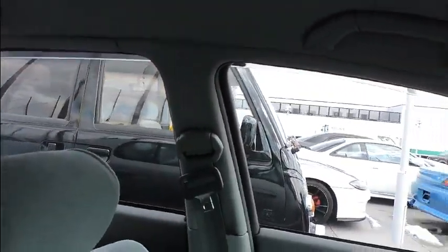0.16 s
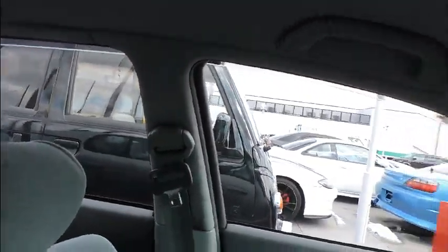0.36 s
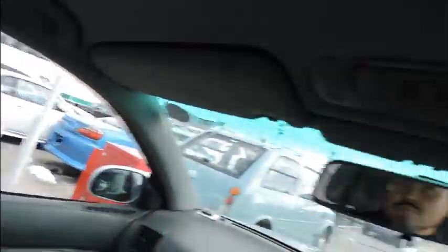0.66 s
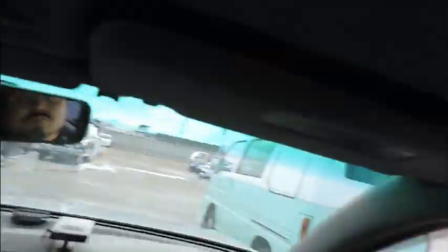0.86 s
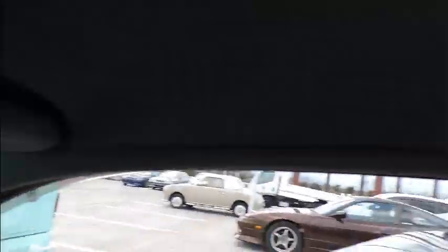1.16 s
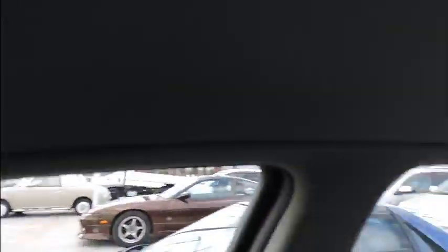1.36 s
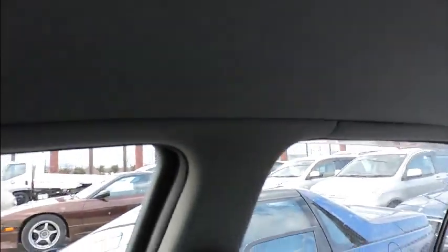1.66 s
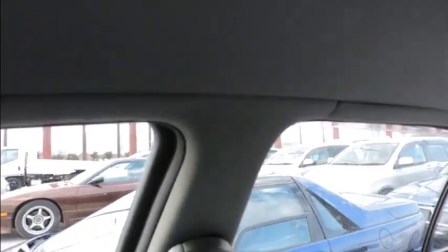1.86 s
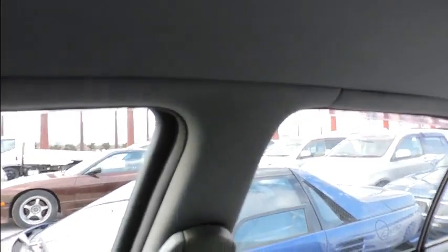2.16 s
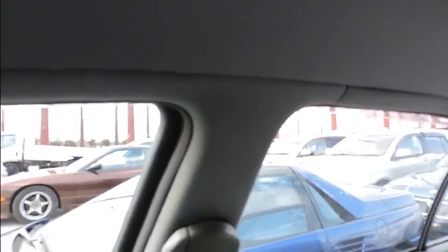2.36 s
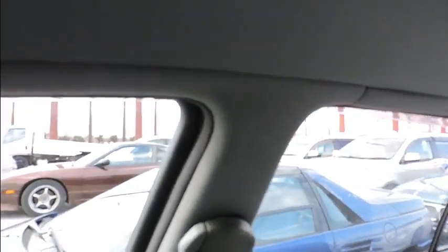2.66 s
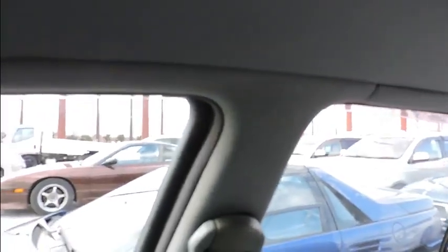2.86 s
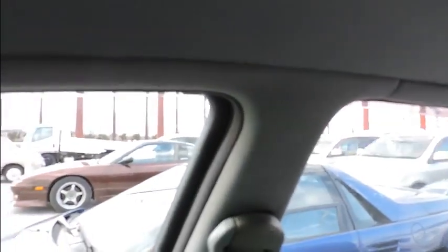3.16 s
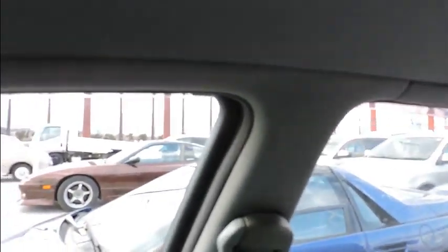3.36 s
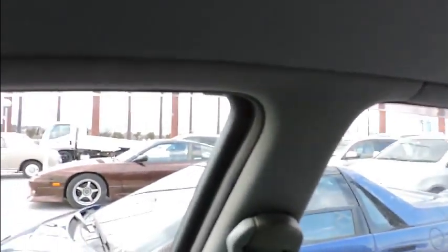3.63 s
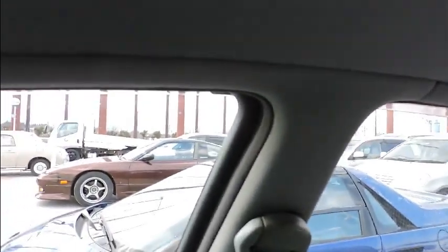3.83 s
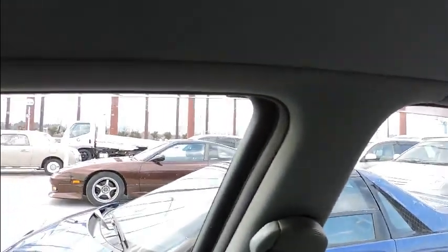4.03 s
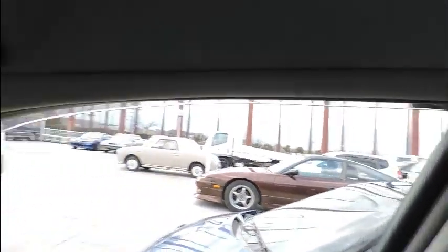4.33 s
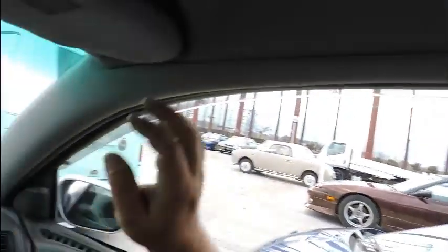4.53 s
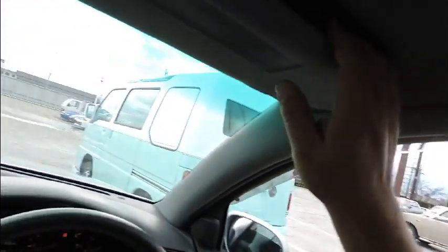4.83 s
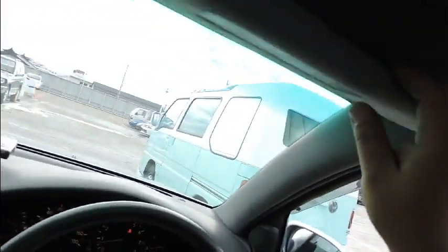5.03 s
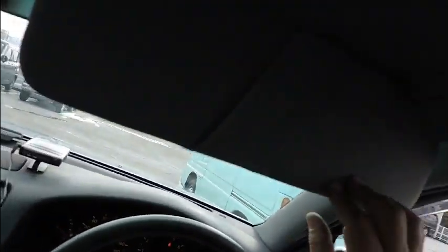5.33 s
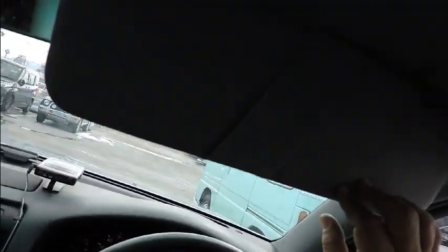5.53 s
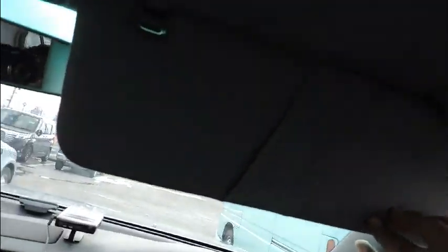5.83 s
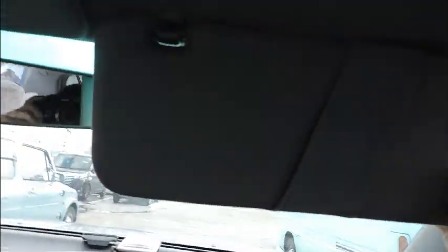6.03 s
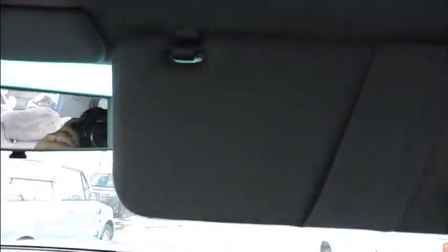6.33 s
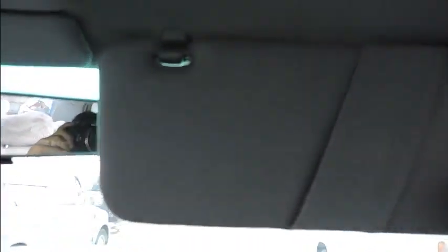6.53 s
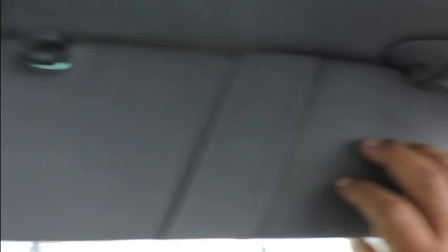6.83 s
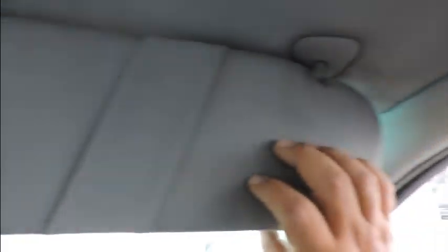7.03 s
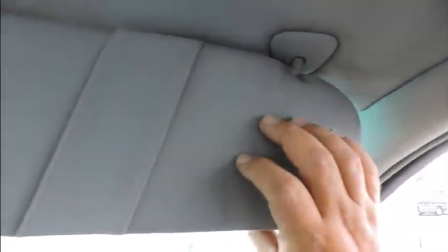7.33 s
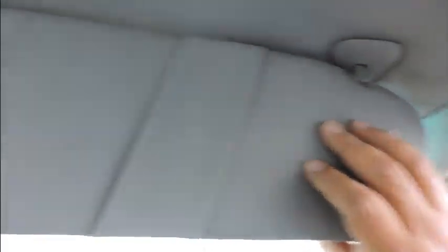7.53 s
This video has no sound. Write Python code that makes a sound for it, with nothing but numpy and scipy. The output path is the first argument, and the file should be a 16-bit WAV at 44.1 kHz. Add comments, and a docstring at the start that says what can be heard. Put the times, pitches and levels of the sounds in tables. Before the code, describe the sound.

Inside a parked car, the engine idles with a low, uneven rumble throughout, and clothes rustle softly against the seat. Everything is close, dry and slightly to the right. A power window motor is whining at the start and stops with a scuff and knock at 0.2 seconds; a switch clicks at 0.6. Around 1.8 to 2 seconds come clicks, a loud door panel knock and glass rubbing on rubber. The motor whines from 2 to 2.7 seconds, sinking in pitch and ending with a click. After more knocks it runs from 3 to 3.8 seconds, straining with a growing hum until the glass squeaks and thumps into its seal. Light clicks follow just after 4 seconds. At about 5.1 seconds a sun visor scuffs and comes down with a sharp snap. Rustling continues, with two faint clicks near 7.5 seconds.

```python
"""Inside a parked car the engine idles and clothes rustle. A window motor whines and stops at 0.2 s.
It runs again from 2.0 to 2.7 s and from 3.0 to 3.8 s; around the runs, switches click, the door panel
knocks and the glass scuffs in its rubber seal. The last run ends with the motor straining and the glass
squeaking into the seal. At 5.1 s a sun visor is pulled down and snaps. More rustling and two faint
clicks follow."""
import sys
import numpy as np
from scipy import signal
from scipy.fft import rfft, irfft, next_fast_len
from scipy.io import wavfile
from scipy.ndimage import uniform_filter1d, map_coordinates

SR = 44100
rng = np.random.default_rng(int(sys.argv[2]) if len(sys.argv) > 2 else 0)


def waveform_to_disk(signal):
    """Save audio, clipped to [-1, 1], as 16-bit WAV at the path in sys.argv[1]."""
    frames = np.transpose(np.atleast_2d(signal))
    scaled = np.clip(frames, -1, 1) * 32767
    samples = np.round(scaled).astype(np.int16)
    wavfile.write(sys.argv[1], SR, samples)


N = 339129


def gain_of(db):
    """Turns decibels into a number to multiply by."""
    return 10 ** (np.asarray(db) / 20)


def evened(x):
    """Scales a signal to an average strength (rms) of 1."""
    return x / np.sqrt(np.mean(x ** 2) + 1e-20)


def peaked(x):
    """Scales a signal to a peak of 1."""
    return x / abs(x).max()


def read(points, hz):
    """Looks up a value between (frequency, value) points, giving each octave equal room."""
    f, value = np.transpose(points)
    return np.interp(np.log(hz + 1), np.log(f + 1), value)


def curves(rows):
    """Returns a gate (1 while a timed table lasts, else 0) and the table's values at every sample."""
    s, *columns = np.transpose(rows)
    t = np.arange(N) / SR
    gate = uniform_filter1d(1. * ((t >= s[0]) & (t <= s[-1])), size=260, mode="nearest")
    return gate, [np.interp(t, s, c) for c in columns]


def wander(per_s):
    """A smooth random wobble through per_s new values a second."""
    knots = rng.standard_normal(int(N / SR * per_s) + 3)
    return evened(map_coordinates(knots, [np.arange(N) / SR * per_s], order=3))


def swell(peak_s, rise_s, fall_s, db):
    """A level that climbs 20 dB in rise_s to its peak, then loses 20 dB every fall_s."""
    t = np.arange(N) / SR - peak_s
    return gain_of(db - 20 * np.minimum(np.maximum(-t / rise_s, t / fall_s), 10))


def coloured(points, grain_db=0.):
    """Stereo noise of rms 1, shaped by (frequency, level) points; grain_db makes it gritty."""
    # how alike left and right are: (frequency [Hz], likeness [0 to 1])
    likeness = [(60, 0.99), (180, 0.96), (550, 0.96), (1650, 0.7), (4970, 0.42), (15000, 0.08)]
    # the noise leans to the right: (frequency [Hz], left minus right [dB])
    balance = [(60, -5.0), (240, -5.0), (950, -3.0), (3770, -2.5), (15000, -2.5)]
    size = next_fast_len(N)
    white = rng.standard_normal((2, N))
    grit = gain_of(grain_db * wander(700)) if grain_db else 1
    a, b = rfft(white * grit, size)
    hz = np.fft.rfftfreq(size, 1 / SR)
    same, lean = read(likeness, hz), gain_of(read(balance, hz) / 2)
    spectrum = np.array([a * lean, (same * a + np.sqrt(1 - same ** 2) * b) / lean])
    return evened(irfft(spectrum * gain_of(read(points, hz)), size)[:, :N])


def band(lo_hz, hi_hz, tilt_db, grain_db=0.):
    """Noise in one band that slopes by tilt_db from end to end."""
    return coloured([(lo_hz / 4, -120), (lo_hz * .7, -30), (lo_hz, 0),
                     (hi_hz, tilt_db), (hi_hz * 1.2, -40), (hi_hz * 4, -120)], grain_db)


def whistle(rows, width_hz):
    """A narrow band of noise that follows a moving pitch."""
    gate, (hz, db) = curves(rows)
    return gate * gain_of(db) * wander(width_hz) * np.cos(2 * np.pi * np.cumsum(hz) / SR)


def placed(x, pan_db=-6.0):
    """Puts a sound in both channels; a negative pan_db moves it to the right."""
    return x * gain_of([[pan_db / 2], [-pan_db / 2]])


def add(mix, s, sound):
    """Mixes a sound in at second s."""
    part = mix[:, round(s * SR):][:, :sound.shape[1]]
    part += sound[:, :part.shape[1]]


def ring(modes, spread_db):
    """One blow: each tone starts at a partly random strength and fades 60 dB in its fade time, t60."""
    t = np.arange(SR // 4) / SR
    hz, db, t60 = np.transpose(modes)[:, :, None]
    chance, phase = rng.standard_normal((2, *hz.shape))
    tones = gain_of(db + spread_db * chance - 60 * t / t60) * np.sin(2 * np.pi * hz * t + phase)
    return peaked(tones.sum(0) * np.minimum(t / 0.00125, 1))  # a padded blow takes a moment


def rattle(peaks, t60, alike=0.7):
    """A dying burst of noise, strongest around the given pitches and partly different in each channel."""
    t, hz = np.arange(8192) / SR, np.fft.rfftfreq(8192, 1 / SR)
    shape = sum(gain_of(db) / (1 + 2j * (hz - f) / width) ** 2 for f, width, db in peaks)
    a, b = rng.standard_normal((2, 8192))
    noise = np.array([a, alike * a + np.sqrt(1 - alike ** 2) * b])
    burst = noise * gain_of(-60 * t / t60) * np.minimum(t / 0.00016, 1)
    return peaked(irfft(rfft(burst) * shape))


def click(hz, body_hz, body_db, hiss_db, t60):
    """Small plastic parts rattle: a bright ring, a hiss and a lower body."""
    # where each of the three is strongest: (pitch [Hz], width [Hz], level [dB])
    bright_peaks = [(3080, 740, -6), (4100, 5300, -4.5)]
    hiss_peaks = [(8880, 1300, 3), (10600, 4800, 7), (14800, 1600, -22)]
    body_peaks = [(686, 650, -11.5), (1335, 460, -3.5)]
    bright = rattle(bright_peaks + [(hz, 700, 0)], t60)
    hiss = rattle(hiss_peaks, 0.69 * t60, alike=0.042)
    body = rattle(body_peaks + [(body_hz, 500, -2.)], t60)
    return bright + gain_of(hiss_db) * hiss + gain_of(body_db) * body


def steady_noise():
    """Steady low cabin noise, with the microphone's faint hiss in the treble."""
    # its tone colour: (frequency [Hz], level [dB])
    noise_colour = [(40, -28), (55, -2), (98, -5), (122, 0.5), (160, -3.5), (218, -1.5), (310, -14),
                    (400, -19), (800, -31), (1600, -30), (3200, -35), (5000, -39), (8000, -41.5),
                    (13000, -48), (15800, -49)]
    return gain_of(-50.5) * coloured(noise_colour)


def engine():
    """The idling engine's firing booms in the cabin, with a weaker octave and a lumpy rumble."""
    # the boom: (time [s], level [dB])
    boom_levels = [(0, -38.5), (.38, -45.5), (.51, -38.5), (1.76, -42), (1.95, -32), (2.1, -44),
                   (2.4, -34.5), (2.89, -36), (3.19, -25.5), (3.28, -35), (3.85, -33), (3.94, -41),
                   (4.02, -33), (4.26, -35.5), (4.41, -41), (5.55, -41), (5.76, -35), (6.06, -38),
                   (6.3, -48.5), (6.7, -43), (7.05, -40), (7.15, -41.5), (7.69, -43.5)]
    # the firing: (time [s], rate [Hz], level of the octave above [dB])
    firing = [(0, 33.97, -54.5), (1.3, 35.5, -50), (1.78, 36.23, -45), (2.0, 34.52, -46.5),
              (5.0, 34.86, -58), (6.05, 38.63, -51.5), (6.25, 34.73, -64), (7.69, 35.94, -54)]
    _, (boom_db,) = curves(boom_levels)
    _, (hz, octave_db) = curves(firing)
    phase = 2 * np.pi * np.cumsum(hz * (1 + .015 * wander(10))) / SR
    uneven = 1 + 0.17 * wander(16) + 0.19 * wander(6.8)
    boom = np.sqrt(2) * uneven * np.sin(phase)
    rumble = .3 * band(26, 46, -2.)[0]
    octave = gain_of(octave_db + 2 * wander(5.9)) * np.sin(2 * phase)
    shudder = gain_of(-43.0) * band(18, 27.7, 0.)[0]  # the car body rocks below the firing rate
    return placed(gain_of(boom_db) * (boom + rumble) + octave + shudder, -5.0)


def rustle():
    """Clothes and seat rustle as the driver turns, and never fall quite silent."""
    # tone colours of soft cloth and hissing fibres: (frequency [Hz], level [dB])
    cloth_colour = [(180, -17), (300, 1.5), (362, -9.5), (417, -6), (855, -10), (951, -10), (1670, -15.5),
                    (2590, -18.5), (5000, -29.5), (6500, -69), (11000, -120)]
    hiss_colour = [(3500, -27), (5000, 5.5), (8000, -0.5), (12000, 1), (14500, -2.5), (15800, -4)]
    # the movements: (peak time [s], rise [s], fall [s], base level [dB], hiss offset [dB])
    moves = [(1.2, 0.65, 0.77, -57.5, -13), (1.46, 0.67, 0.22, -58, -19), (2.72, 0.15, 0.52, -62.5, -25),
             (4.33, 0.25, 0.68, -65, -9), (5.4, 0.61, .7, -57, -10), (5.97, 0.22, .6, -64.5, -9),
             (6.45, 0.61, 0.18, -61, -7.5), (7.17, 0.55, 0.23, -66, -3.5), (7.62, 0.56, .6, -62, -6.5)]
    moving_power = sum((swell(*shape) * gain_of([[3.5], [hiss_db]])) ** 2 for *shape, hiss_db in moves)
    still_power = gain_of([[-61.5], [-78.5]]) ** 2
    cloth_level, hiss_level = np.sqrt(moving_power + still_power)
    return cloth_level * coloured(cloth_colour) + hiss_level * coloured(hiss_colour)


def swish():
    """A faint swish whose pitch rises."""
    # its path: (time [s], pitch [Hz], level [dB])
    glide = [(.9, 2350, -78), (1.03, 2480, -62), (1.3, 3010, -72), (1.45, 3630, -74), (1.52, 3770, -82)]
    return placed(whistle(glide, width_hz=500))


def cabin_echo(x):
    """The small, padded cabin throws back scattered echoes that die quickly, different on each side."""
    t = np.arange(SR // 6) / SR
    signs = rng.choice([-1., 1.], (2, len(t)))
    arrives = (rng.random((2, len(t))) < .06) & (t > .002)
    echoes = signs * arrives * gain_of(-60 * t / 0.065)
    return signal.fftconvolve(x, echoes / np.linalg.norm(echoes[0]), axes=1)[:, :N]


def door_thumps():
    """When the glass jerks, the door skin pumps the cabin air in slow swings that soon die."""
    # the jerks: (time [s], level [dB], swing rate [Hz], push or pull [+1 or -1])
    jerks = [(0.231, -25, 13, 1), (.272, -22.5, 27.5, -1), (1.822, -17, 19.4, -1), (1.942, -15.5, 22, 1),
             (3.821, -30, 29.8, 1), (3.864, -20.5, 25, -1)]
    out, t = np.zeros((2, N)), np.arange(SR // 4) / SR
    for s, db, hz, push in jerks:
        add(out, s, placed(push * gain_of(db - 60 * t / 0.47) * np.sin(2 * np.pi * hz * t)))
    return out


def scuffs():
    """Rubber, cloth and glass rub, making noise in four ranges: scrape, body, thud and hiss."""
    # a scrape heard through the pane: (frequency [Hz], level [dB])
    glass_colour = [(1200, -5), (1500, 1.5), (1650, 5.5), (2100, -4), (2500, -3.5), (2700, 2), (2950, -8.5),
                    (3500, -3), (4500, -12.5), (5000, -12), (6000, -40)]
    # the rubs: (peak time [s], rise [s], fall [s], scrape level [dB],
    # body offset [dB], thud offset [dB], hiss offset [dB])
    rubs = [(0.225, 0.013, 0.053, -43.5, 6.5, 16, -12.5), (.273, 0.02, 0.023, -51.5, 2, 15, -5.5),
            (1.81, 0.013, 0.12, -51.5, 11, 7, -30), (1.85, 0.033, 0.045, -45.5, 9, 10, -13),
            (1.896, 0.027, 0.024, -55.5, 28, 28, -24), (1.948, 0.028, 0.022, -30, 6, 9, -14),
            (1.985, 0.058, 0.14, -56, 15, 24.5, -17), (2.957, .005, 0.057, -54, 11.5, 2, -26),
            (3.029, .06, 0.062, -50.5, 11, 18.5, -18), (3.84, 0.029, 0.039, -30.5, -9.5, 3, -10.5),
            (3.88, 0.051, 0.029, -46, 6, 11.5, -27), (4.921, .01, 0.023, -68, 0, 0, 4),
            (4.956, 0.0093, .04, -62.5, -3, 0, 4), (4.975, 0.096, 0.17, -53, -1.5, -5, -15),
            (5.044, 0.039, 0.039, -64, 5, -8, 9), (5.108, 0.11, 0.06, -54, -2, 0, -2)]
    scrape, body = coloured(glass_colour, grain_db=3.0), band(278, 1330, -8.0, grain_db=4.0)
    thud, hiss = band(54, 283, -8.5), band(4700, 14200, -0.5, grain_db=2.5)
    levels = sum(swell(*shape) * gain_of([[0], [body_db], [thud_db], [hiss_db]])
                 for *shape, body_db, thud_db, hiss_db in rubs)
    return sum(level * layer for level, layer in zip(levels, (scrape, body, thud, hiss)))


def seal_squeak():
    """The glass squeaks into its seal in narrow bands of noise that mostly sink in pitch."""
    # one list for each band: (time [s], pitch [Hz], level [dB])
    glides = [
        [(3.82, 2300, -46), (3.84, 2700, -36), (3.852, 2500, -44)],
        [(3.82, 4800, -43), (3.845, 4500, -44), (3.868, 4400, -50)],
        [(3.828, 3900, -42), (3.87, 3400, -45)],
        [(3.843, 1650, -43), (3.868, 1300, -42)],
    ]
    return placed(sum(whistle(rows, width_hz=300) for rows in glides))


def trim_ticks():
    """The plastic trim ticks as its small parts rattle."""
    # the ticks: (time [s], level [dB], body pitch [Hz], body offset [dB])
    ticks = [(.2214, -32.5, 695, 6.5), (0.687, -53, 544, 3), (0.9673, -45.5, 476, 2),
             (1.8293, -32, 735, -2), (1.885, -32, 760, 4), (1.9105, -44, 510, 12), (1.946, -20.5, 664, -8),
             (3.041, -40, 452, 3), (3.8844, -45, 767, -10), (5.05, -43.5, 1360, 14),
             (5.0643, -31, 990, 9.5), (5.2554, -56, 1530, 9)]
    out = np.zeros((2, N))
    for s, db, body_hz, body_db in ticks:
        add(out, s, gain_of(db) * placed(click(2380, body_hz, body_db, hiss_db=-17, t60=0.03), -4.5))
    return out


def switches():
    """Each switch clicks, and its cap rings briefly."""
    # the clicks: (time [s], level [dB], body offset [dB], hiss offset [dB], fade time [s], pan [dB])
    presses = [(.608, -29, -5.5, 2, 0.046, -5.5), (1.7978, -45, 10.5, 0, 0.031, -2),
               (2.649, -30, 2, 4, 0.073, -2.5), (2.957, -43.5, 10, -1, 0.039, -2),
               (4.1227, -40.5, 0.5, -6, 0.033, 0), (4.125, -44.5, 5, 2, 0.046, -3),
               (4.151, -50, 13, 0, .04, -1), (4.349, -54.5, 8, 3, 0.036, -1),
               (7.5318, -51.5, 9.5, 5.5, 0.017, -1), (7.6614, -51.5, 4, -1, 0.026, -1)]
    # the ringing cap: (pitch [Hz], level [dB], fade time [s])
    cap_tones = [(585, -1, .04), (2420, -3.5, 0.034), (3140, -10, 0.031), (4050, -2, 0.036),
                 (4270, -1, .035), (4830, -7, .025)]
    bright_hz, body_hz = 4220, 590
    out = np.zeros((2, N))
    for s, db, body_db, hiss_db, t60, pan_db in presses:
        add(out, s, gain_of(db) * placed(click(bright_hz, body_hz, body_db, hiss_db, t60), pan_db))
        add(out, s, gain_of(db - 4) * placed(ring(cap_tones, spread_db=3.7), pan_db))
    return out


def door_knocks():
    """Knocks set the door panel ringing."""
    # the knocks: (time [s], level [dB])
    knocks = [(0.223, -36), (0.262, -38.5), (0.81, -43.5), (1.886, -14.5), (2.019, -25.5), (2.997, -26),
              (3.021, -25)]
    # the ringing panel: (pitch [Hz], level [dB], fade time [s])
    panel_tones = [(433, -6.5, 0.095), (784, 7.5, 0.03), (1090, -37, 0.0091), (1270, 8.5, 0.0048),
                   (1666, -40, 0.22), (2260, -39, 0.11)]
    out = np.zeros((2, N))
    for s, db in knocks:
        add(out, s, gain_of(db) * placed(ring(panel_tones, spread_db=0.87)))
    return out


def visor_snap():
    """The sun visor snaps down: it rings and its pad slaps."""
    # the ringing visor: (pitch [Hz], level [dB], fade time [s])
    visor_tones = [(130, -8.5, 0.14), (172, -10, 0.15), (222, -8, 0.104), (260, -12.5, 0.11),
                   (328.7, -20, 0.13), (400, -10, .07), (510, -6.5, 0.061), (790, -7, 0.059),
                   (945, -10, 0.022), (1414, 3.5, 0.023), (1750, 5.5, 0.016), (2290, -8, 0.03),
                   (3180, -15, 0.027)]
    # the slap: (pitch [Hz], width [Hz], level [dB])
    pad_peaks = [(151, 61, -4), (610, 350, 4.5), (1470, 1070, 4.5), (2180, 240, -12), (3070, 460, -5),
                 (7000, 2800, -25)]
    out, snap_s = np.zeros((2, N)), 5.1408
    add(out, snap_s, gain_of(-8.5) * placed(ring(visor_tones, spread_db=0.71), -5.5))
    add(out, snap_s, gain_of(-12.5) * placed(rattle(pad_peaks, t60=0.033), -5.5))
    return out


def motor_strain():
    """The motor strains with a growing hum as the glass nears its stop."""
    # the hum: (time [s], pitch [Hz], level [dB])
    hum_path = [(3.62, 116.8, -44.5), (3.704, 114.3, -38.5), (3.86, 113.9, -34)]
    # its tones: (multiple of the pitch, offset [dB])
    hum_tones = [(1, 0.5), (2, -4.5), (3, -17), (4, -13.5)]
    gate, (hz, db) = curves(hum_path)
    phase = 2 * np.pi * np.cumsum(hz) / SR
    hum = sum(gain_of(db + offset + 2.5 * wander(24.85)) * np.sin(k * phase) for k, offset in hum_tones)
    return placed(gate * hum)


def window_motor():
    """The motor whines at multiples of its shaft speed, over the throbbing hiss of its brushes."""
    # hiss of the brushes, the motor's sliding contacts: (frequency [Hz], level [dB])
    brush_colour = [(200, -4), (300, -4.5), (450, -10), (900, -9), (1500, -22), (2600, -17), (4500, -23),
                    (5600, -27.5), (7500, -35.5), (11500, -35), (13500, -39), (15800, -44)]
    # one list a run; load slows the shaft: (time [s], speed [turns/s], brush and glass noise [dB])
    runs = [
        [(0, 81.3, -53), (.18, 82.8, -53), (.217, 82, -47)],
        [(2.03, 100.5, -51), (2.2, 96.4, -53.5), (2.3, 94.06, -53), (2.4, 90.4, -49), (2.5, 85.4, -48.5),
         (2.58, 85.6, -48.5), (2.657, 84.2, -46.5)],
        [(3.04, 89, -49), (3.086, 87, -51), (3.116, 78.45, -51), (3.159, 80.85, -50.5), (3.388, 84.3, -53.5),
         (3.6, 87.4, -52), (3.66, 86, -49), (3.82, 89.9, -53.5)],
    ]
    # one row a run: (the multiples of the shaft speed that lead the whine)
    lead_multiples = [(7, 20), (5, 9, 10, 20), (10, 20, 30)]
    # one row a run: (base level of the weak tones [dB], then of each leading tone [dB])
    whine_levels = [(-9, -50, -65.5), (-1.5, -42, -50.5, -48.5, -56), (-2, -43.5, -57, -58.5)]
    # weak tones heard through the door: (frequency [Hz], level [dB])
    through_door = [(300, -67.5), (450, -58), (560, -59), (700, -56.5), (850, -58.5), (1080, -60),
                    (1180, -64.5), (1350, -65), (1700, -69.5), (2700, -81.5)]
    # a leading tone sings near the door's own pitches: (pitch [Hz], width [Hz], level [dB])
    door_peaks = [(468, 62, -1), (584, 50, 0), (849, 95, 0), (1583, 58, 7), (1627, 71, 0), (1738, 95, -0.5),
                  (1980, 100, -9.5), (2436, 125, -1.5), (2590, 160, -8)]
    spin_up_s, grip_s, grip_db = 0.045, 3.63, -14  # the seal grips the glass and mutes the leading tones
    out, hiss = np.zeros((2, N)), coloured(brush_colour, grain_db=0.5)
    for rows, leads, (weak_db, *lead_db) in zip(runs, lead_multiples, whine_levels):
        gate, columns = curves(rows)
        on = slice(*np.flatnonzero(gate > 1e-6)[[0, -1]])
        t = np.arange(N)[on] / SR
        speed, noise_db = (c[on] for c in columns)
        angle = 2 * np.pi * np.cumsum(speed * (1 + 0.0019 * wander(30.12)[on])) / SR
        spin_up = np.minimum((t - t[0]) / spin_up_s, 1) if rows[0][0] else 1  # run one is under way
        grip = gain_of(np.interp(t, [grip_s, grip_s + 0.035], [0, grip_db]))
        gains = {k: gain_of(weak_db + read(through_door, k * speed)) for k in range(4, 33)}
        for k, db in zip(leads, lead_db):
            singing = sum(gain_of(peak_db) / (1 + (2 * (k * speed - hz) / width) ** 4)
                          for hz, width, peak_db in door_peaks)
            gains[k] = spin_up * grip * gain_of(db) * singing
        flutter, whine = wander(18), 0
        for k, gain in gains.items():
            flutter_db = (1.3 if k in leads else 2.5) * np.roll(flutter, 9000 * k)[on]
            whine += gain * gain_of(flutter_db) * np.sin(k * angle + 7 * rng.random())
        # once a turn, and once for each of the ten contact bars that pass the brushes
        throb = 1 + 0.088 * np.sin(angle) + 0.42 * np.sin(10 * angle)
        out[:, on] += gate[on] * (placed(whine) + gain_of(noise_db) * hiss[:, on] * throb)
    return out


def scene():
    """Adds up all the sources; only the sharp hits get an echo."""
    hits = switches() + trim_ticks() + door_knocks() + visor_snap()
    echo = gain_of(-9.5) * cabin_echo(hits)
    movement = door_thumps() + window_motor() + motor_strain() + scuffs() + seal_squeak()
    background = engine() + rustle() + swish() + steady_noise()
    return background + movement + hits + echo


def record(dry):
    """The left side is farther from the door and hears a little later; the highest treble is cut."""
    lag_samples, cutoff_hz = 2, 15830
    channels = np.array([np.roll(dry[0], lag_samples), dry[1]])
    treble_cut = signal.firwin(1023, cutoff_hz, window=("kaiser", 9), fs=SR)
    return signal.oaconvolve(channels, treble_cut[None], "same")


dry = scene()
out = record(dry)
waveform_to_disk(out)
```